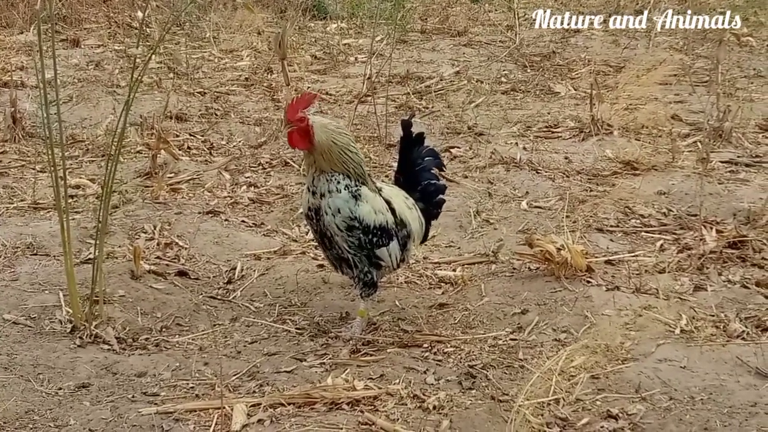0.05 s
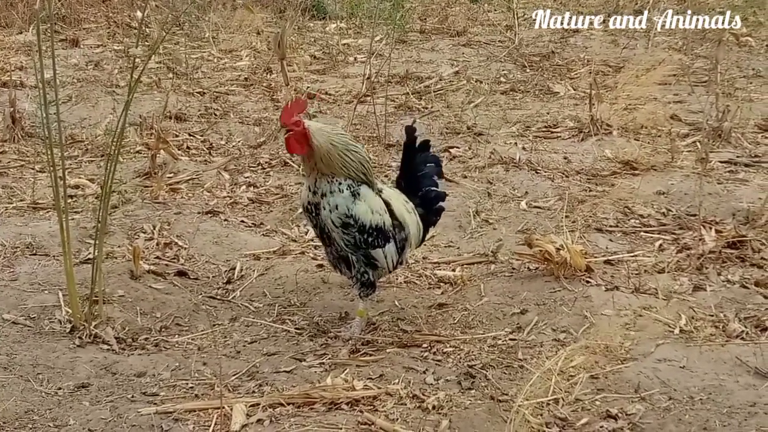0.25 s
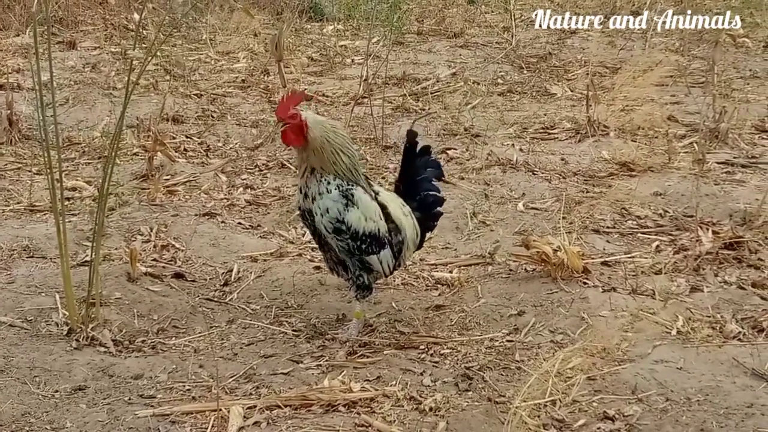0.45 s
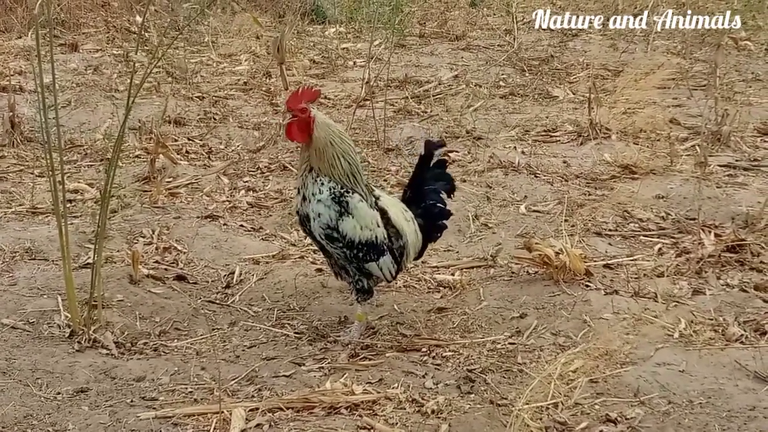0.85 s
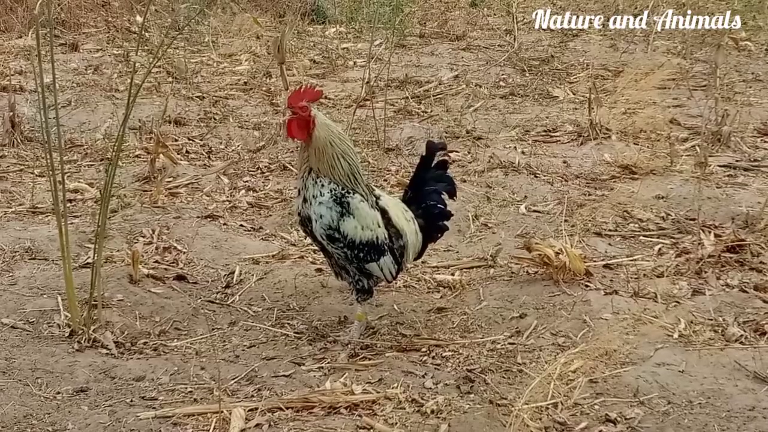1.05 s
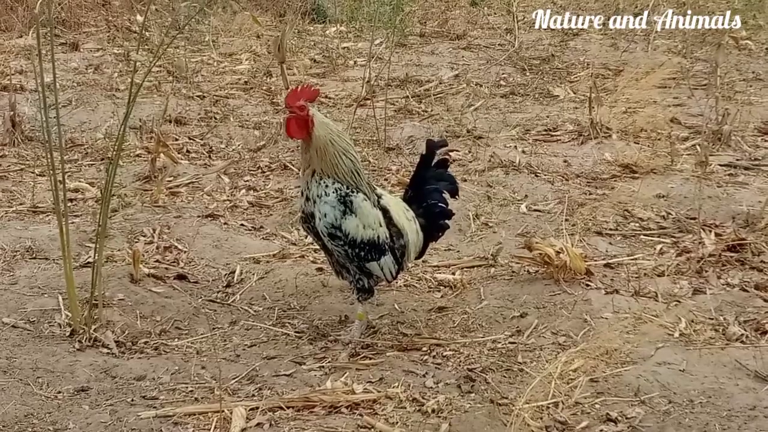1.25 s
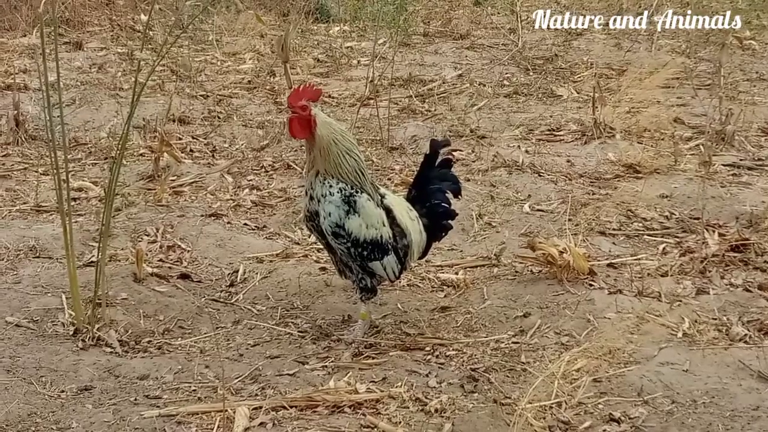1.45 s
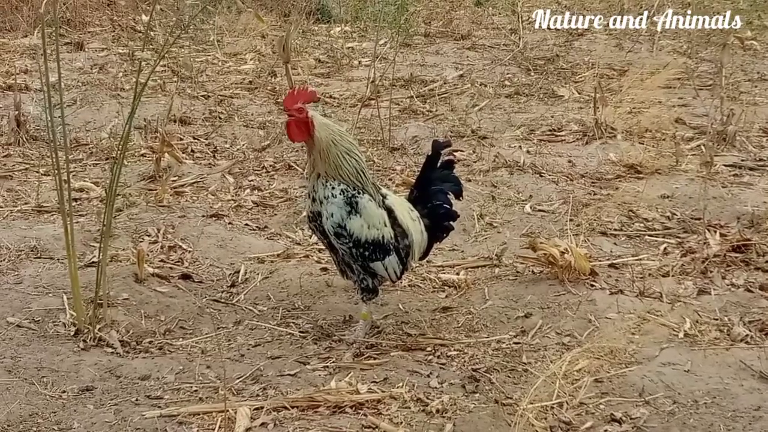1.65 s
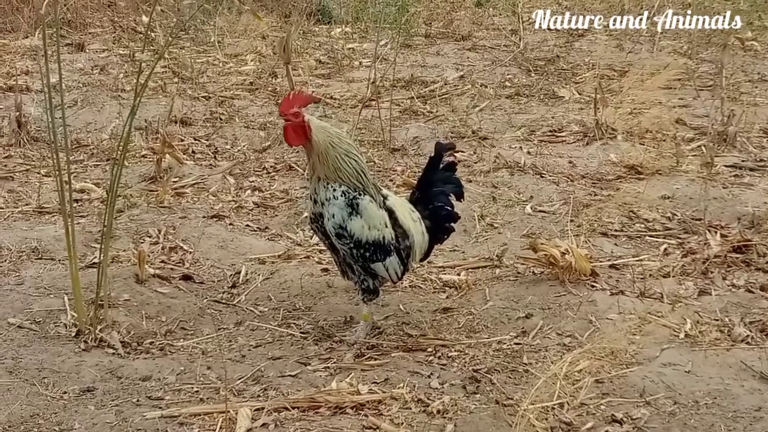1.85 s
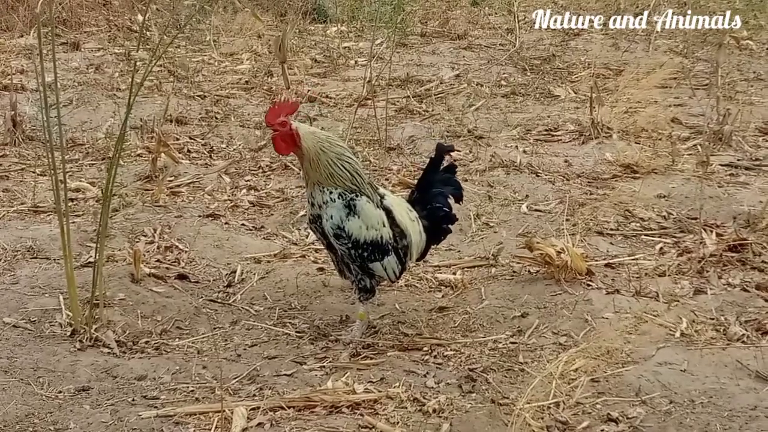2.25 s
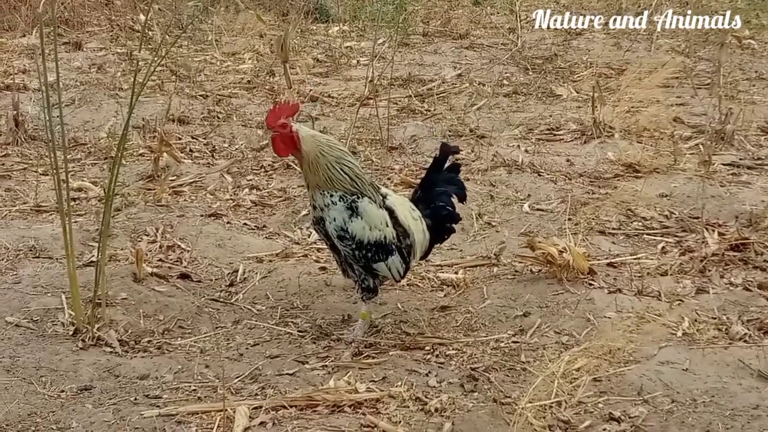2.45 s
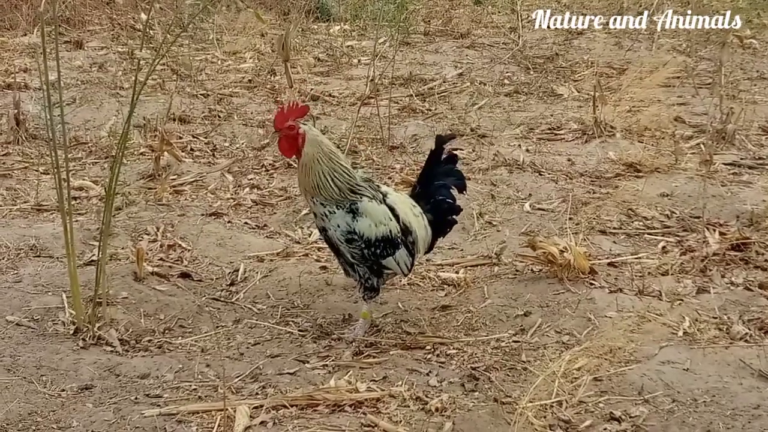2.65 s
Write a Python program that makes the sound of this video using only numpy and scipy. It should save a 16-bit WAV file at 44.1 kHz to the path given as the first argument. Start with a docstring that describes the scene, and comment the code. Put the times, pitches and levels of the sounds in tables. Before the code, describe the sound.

A rooster crows once, close by in an open field. A hoarse syllable starts at 0.2 seconds, a short high one follows near 0.5, and a long raspy note runs from 0.6 to 2.5, finishing cleaner and lower, then trailing into a soft groan by 2.7. A distant bird calls faintly in the first 0.6 seconds. Light wind bumps the microphone near 0.3 and 2.2, over a faint steady hush.

```python
"""A rooster crows once, close by, in an open field: a hoarse syllable, a short high one, a long one.
His syrinx has a high and a low register, each a harmonic series. Where they clash, the coupled
membranes beat chaotically and drive the throat resonances into a rasp. The crow ends on a clean low
note and a soft groan. Another bird calls far off, and light wind bumps the microphone."""
import sys
import numpy as np
from scipy import signal
from scipy.fft import rfft, irfft
from scipy.io import wavfile
from scipy.ndimage import uniform_filter1d

SR = 44100
rng = np.random.default_rng(int(sys.argv[2]) if len(sys.argv) > 2 else 0)


def persist_wave(psi):
    """Save psi, clipped to +-1, as 16-bit WAV."""
    counts = np.round(np.clip(psi, -1, 1) * 32767).astype(np.int16)
    wavfile.write(sys.argv[1], SR, np.atleast_2d(counts).T)


N = 119070

# Registers, one table a syllable: (time [s], pitch [Hz], nominal level [dB], roughness [1 = full])
HIGH_SYLLABLES = [
    [(.44, 641.4, -28, 0.33), (.458, 743, -25, 0.42), (.474, 795, -19, 0.3), (.49, 817, -21, 0.2),
     (.512, 783, -17, 0.2), (.54, 742, -17.5, 0.3), (.555, 661, -26.5, 0.2), (.585, 616, -36, 0.5)],
    [(.618, 621, -28.5, 0.77), (.645, 755, -19, 0.65), (.675, 782, -16, 0), (.73, 798.5, -17, 0),
     (.81, 789.4, -16.5, 0), (.85, 778, -17, 0.27), (.95, 752.2, -38, 0.92), (1.72, 742.3, -29, 0.65),
     (1.85, 735, -37.5, 0.94)],
]
LOW_SYLLABLES = [
    [(.2, 535.4, -44, 0.46), (.215, 558.6, -35, 0.63), (.3, 574.2, -30, 1.02), (.365, 575.5, -24, 0.13),
     (.39, 603, -51, 0.1)],
    [(.92, 540.7, -51.5, 0.64), (1.3, 593.8, -35.5, 0.77), (1.75, 588.1, -40, 0.8),
     (1.88, 600.6, -33.5, 0.29), (2.05, 591.5, -29.5, 0.48), (2.15, 580.2, -31.5, 1.2),
     (2.188, 605.7, -24.5, 0.05), (2.395, 581.2, -22.5, 0.17), (2.417, 569.3, -20, 0.37),
     (2.435, 511, -29.5, 0.87), (2.466, 473, -31.5, 1.08), (2.485, 315, -53.5, 1.1)],
]
# Spectral envelopes of the registers: (frequency [Hz], relative gain [dB])
HIGH_SPECTRUM = [(600, 7), (800, -10.5), (1600, 0.5), (2350, -7), (3150, 0), (3400, -22.5), (3800, -37),
                 (4800, -24.5), (5550, -20), (6350, -27.5), (7150, -28.5), (7700, -50.5), (8700, -39),
                 (9500, -56.5), (12000, -55.5)]
LOW_SPECTRUM = [(590, 7.5), (950, 3.5), (1190, 1), (1460, 15.5), (1780, -14.5), (2380, -1), (2950, 4.5),
                (3500, -31), (5400, -22.5), (6000, -32), (7500, -65.5), (10200, -35), (12000, -57)]
# Chaotic beating: (time [s], drive level [dB], beak opening [0-1])
RASP_DRIVE = [(.195, -53, 0.55), (.21, -19.5, 0.42), (.372, -22.5, 0), (.392, -35, 0.8), (.435, -57, 0.5),
              (.456, -12.5, 0.7), (.48, -42, 0.75), (.525, -41, 1), (.552, -26, 0.94), (.605, -37.5, 0.67),
              (.632, -20.5, 0.83), (.655, -24.5, 0.75), (.69, -51, 0.8), (.805, -47.5, 1), (.83, -23, 0.85),
              (.9, -18, 0.76), (1.15, -21, 0.78), (1.55, -18, 0.65), (1.9, -19.5, 0.42), (2.08, -23.5, 0.1),
              (2.165, -20, 0), (2.195, -43.5, 0.6), (2.41, -76, 0), (2.445, -23.5, 0.07),
              (2.468, -52.5, 0.2), (2.495, -88, 0.1)]
# The two clashing membranes: (time [s], low pitch [Hz], high pitch [Hz])
MEMBRANE_PITCHES = [(.35, 577.7, 790), (.95, 542, 775.7), (1.35, 588, 773.2), (1.7, 586, 749),
                    (1.95, 595, 776.7)]
# Throat and beak resonances:
# (centre [Hz], bandwidth [Hz], gain wide open [dB], gain nearly shut [dB], voiced share [0-1])
FORMANTS = [(580.6, 46, -33.5, -10.5, 0.31), (793, 340, -15, -34, 0.07), (1137, 240, -18, -11.5, 0.27),
            (1383, 123, -19, -4.5, 0.53), (1495, 240, -15, -16.5, 0.4), (1954, 140, -12.5, -16.5, 0.12),
            (2278, 210, -10, -14, 0.6), (2682, 360, -13.5, -6.5, 0.17), (2880, 180, -11, -14.5, 0.6),
            (3346, 320, -15.5, -22.5, 0.6), (4014, 120, -27.5, -35.5, 0.2), (4457, 400, -4, -75, 0.1),
            (5103, 223, -14.5, -29, 0.1), (5840, 330, -21, -59, 0.3), (6660, 210, -26.5, -60, 0.1),
            (7490, 220, -34.5, -72, 0.2)]
# Register overtones that stand out of the rasp: (time [s], frequency [Hz], nominal level [dB])
OVERTONE_TRACKS = [
    [(.91, 1095, -30), (1.18, 1119, -30), (1.36, 1200, -28.5)],
    [(.86, 1535, -35.5), (1.08, 1557, -22.5), (1.27, 1519, -39.5), (1.37, 1539, -32.5), (1.8, 1469, -30.5)],
    [(1.15, 2310, -34), (1.36, 2337, -27.5)],
    [(1.77, 2397, -31), (1.97, 2426, -28), (2.15, 2328, -34.5)],
    [(.88, 2600, -46.5), (1.06, 2731, -25), (1.24, 2767, -30), (1.39, 2895, -25), (1.72, 2901, -28.5),
     (1.85, 2870, -29), (2.16, 2853, -30.5)],
]
# Groans and the far bird, one table a call: (time [s], pitch [Hz], level [dB], roughness [1 = full])
GROAN_CALLS = [
    [(.11, 238.6, -72, .3), (.16, 263.2, -52, 0.1), (.205, 240, -59, 0.4)],
    [(2.49, 240.5, -58, 0.8), (2.54, 263.8, -44.5, 1), (2.7, 242, -49, 1.14)],
]
FAR_CALLS = [
    [(0, 794, -36.5, 1.23), (.06, 750, -45.5, 0.41), (.21, 762, -40, 1)],
    [(.37, 554, -37.5, 0), (.445, 514, -35.5, 0.4)],
    [(.555, 547, -32, 0), (.578, 526, -27.5, 0.4), (.603, 556, -41.5, 0.04), (.63, 510, -16, 0)],
]
# Wind on the microphone: (time [s], level [dB])
WIND_GUSTS = [(0, -60), (.2, -52), (.3, -33), (.345, -68.5), (1.93, -67.5), (1.99, -50.5), (2.22, -62),
              (2.25, -43), (2.4, -59)]
# Spectral envelopes of groans, far bird, wind and field: (frequency [Hz], relative gain [dB])
GROAN_SPECTRUM = [(260, 2), (530, 6), (790, -16), (1150, 7.5), (2400, -12.5), (3500, -51)]
FAR_SPECTRUM = [(530, -13), (770, -11), (1080, 10.5), (1520, 6.5), (1700, 1.5), (2250, -14), (4500, -18)]
WIND_SPECTRUM = [(25, -27), (50, -6.5), (150, -4.5), (320, -33.5), (2000, -77)]
FIELD_SPECTRUM = [(30, -22), (150, 0), (350, -12), (900, -9.5), (1400, 8.5), (4000, -2), (6000, -6),
                  (7500, -39), (16000, -36)]

WANDER_SHARE, JITTER_CYCLES, SHIMMER_DB, DULLING_DB = 0.01888, 0.013, 0.5, -9.5  # at full roughness
FLUTTER_SHARE, FLUTTER_DB, FLICKER_DB, STRAIN_CYCLES = .0035, 4, 1.5, .005  # at flutter = 1
FLUTTER_HZ, STRAIN_HZ = 39.65, 215


def rooster():
    """Superposition: the rasp, the two registers of the syrinx and their overtones form the crow."""
    high_lead, low_lead, chaos_lead = competition()
    power, chaos = effort()
    crow = rasp() * np.sqrt(chaos_lead) + overtones()
    # The registers come and go while the syrinx is chaotic.
    crow += voice(HIGH_SYLLABLES, HIGH_SPECTRUM, harmonics=19, flutter=0.73) * high_lead ** chaos
    crow += voice(LOW_SYLLABLES, LOW_SPECTRUM, harmonics=19) * low_lead ** chaos
    return saturate(crow, power, chaos)


def voice(syllables, spectrum, harmonics, flutter=0):
    """A nearly periodic vibration gives a harmonic series; roughness perturbs pitch, phase and level."""
    t = np.arange(N) / SR
    out = np.zeros(N)
    for rows in syllables:
        hz, db, rough = curves(rows)
        rough = np.clip(rough, .09, 1)
        tremble = flutter * np.sin(2 * np.pi * np.cumsum(FLUTTER_HZ * (1 + 0.15 * walk(23))) / SR)
        hz = hz * (1 + WANDER_SHARE * rough * walk(130) + FLUTTER_SHARE * tremble + 0.0012 * walk(200))
        cycles = np.cumsum(hz) / SR + JITTER_CYCLES * rough * walk(500)
        # The low membrane beats against the high note.
        cycles += flutter * STRAIN_CYCLES * np.sin(2 * np.pi * STRAIN_HZ * t + 2 * walk(260))
        gate = during(rows, edge_s=0.0063)
        on = gate > 0
        series, power = 0, 0
        for k in range(1, harmonics + 1):
            treble = np.interp(k * hz[on], [2950, 3100], [0, 1])
            gain = spectral_gain(spectrum, k * hz[on]) * undb(DULLING_DB * rough[on] * treble)
            power += gain ** 2 / 2
            sway_db = (SHIMMER_DB * rough[on] + flutter * FLICKER_DB * (k > 4)) * walk(110)[on]
            sway_db += FLUTTER_DB * tremble[on] * np.clip(k / 2 - 1, 0, 1)
            sway_db += 2.5 * (k > 5) * walk(15)[on]  # upper harmonics also sway slowly
            series += gain * undb(sway_db) * np.sin(2 * np.pi * k * cycles[on])
        out[on] += series / np.sqrt(power) * gate[on] * undb(db[on])
    return out


def rasp(median_closure_hz=646, scatter_db=2):
    """Source and filter: clashing tones and irregular closures ring the throat; a shut beak dulls it."""
    drive_db, opening = curves(RASP_DRIVE)
    timing, size = rng.standard_normal((N // 20, 2)).T
    closures = np.cumsum(np.exp(.3 * timing)) * SR / median_closure_hz
    inside = closures < N
    pulses = np.bincount(closures[inside].astype(int), undb(scatter_db * size[inside]), N)
    tones = clash()
    out = undb(-63.5) * resonance(pulses, hz=9750, width=1300)  # faint hiss
    for k, (hz, width, open_db, shut_db, voiced) in enumerate(FORMANTS):
        tonal = np.sqrt(voiced) * resonance(tones, hz, width)
        pulsed = np.sqrt(1 - voiced) * resonance(pulses, hz, width)
        out += (-1) ** k * (tonal + pulsed) * undb(shut_db + (open_db - shut_db) * opening)
    return out * undb(drive_db)


def clash(wander_share=0.01725):
    """Intermodulation: each membrane modulates the other, adding tones at sums of their harmonics."""
    pitches = [hz * (1 + wander_share * walk(98)) for hz in curves(MEMBRANE_PITCHES)]
    low, high = (np.exp(2j * np.pi * np.cumsum(hz) / SR) for hz in pitches)
    return np.real(np.polyval(np.ones(12), low) * np.polyval(np.ones(3), high))  # orders 0-11 by 0-2


def overtones(waver_hz=20, throb_db=3.5):
    """Register overtones stand out of the rasp as gliding tones, modulated in frequency and level."""
    out = 0
    for rows in OVERTONE_TRACKS:
        hz, db = curves(rows)
        cycles = np.cumsum(hz + waver_hz * walk(260)) / SR
        throb = undb(throb_db * walk(90))
        out += during(rows) * undb(db) * unit(throb * np.sin(2 * np.pi * cycles))
    return out


def competition():
    """Mode competition: high register, low register and chaos lead by turns, at constant total power."""
    leads = undb(7 * np.array([walk(90) for _ in range(3)]))
    return leads / np.sqrt(np.mean(leads ** 2, axis=0))


def effort():
    """Incoherent parts add in power: gives the crow's nominal power and its chaotic share."""
    overtone_power = sum((during(rows) * undb(curves(rows)[1])) ** 2 for rows in OVERTONE_TRACKS)
    chaotic_power = undb(curves(RASP_DRIVE)[0]) ** 2 + overtone_power
    power = chaotic_power + sum(undb(curves(rows)[1]) ** 2 for rows in HIGH_SYLLABLES + LOW_SYLLABLES)
    return power, chaotic_power / power


def saturate(x, power, chaos, strength=.65):
    """Saturation: the membranes swing only so far, so chaotic stretches stay near the nominal power."""
    running_power = np.abs(uniform_filter1d(x ** 2, int(.007 * SR))) + .05 * power
    return x * (power / running_power) ** (strength / 2 * chaos)


def groans():
    """Weak, low-pitched vibration gives a soft harmonic groan before and after the crow."""
    return voice(GROAN_CALLS, GROAN_SPECTRUM, harmonics=12)


def echo(x, t60_s=0.93, cutoff_hz=3520):
    """Scattering from the ground and stalks leaves a faint, dull tail that decays exponentially."""
    t = np.arange(N // 4) / SR
    tail = rng.standard_normal(len(t)) * np.exp(-np.log(1000) * t / t60_s)
    lowpass = signal.butter(2, cutoff_hz, fs=SR, output="sos")
    tail = signal.sosfilt(lowpass, tail / np.linalg.norm(tail))
    return undb(-25) * signal.fftconvolve(x, tail)[:N]


def far_bird():
    """A distant bird calls three notes, each a short harmonic series."""
    return voice(FAR_CALLS, FAR_SPECTRUM, harmonics=6)


def wind():
    """Pressure fluctuations of light wind bump the microphone with low-frequency noise."""
    return noise(WIND_SPECTRUM) * undb(curves(WIND_GUSTS)[0])


def field_hush(level_db=-50.5):
    """Stationary broadband noise forms the hush of the field."""
    return undb(level_db) * noise(FIELD_SPECTRUM)


def undb(db):
    """Amplitude grows tenfold every 20 dB."""
    return 10 ** (np.asarray(db) / 20)


def unit(x):
    """Normalisation to rms 1."""
    return x / np.sqrt(np.mean(x ** 2))


def curves(rows):
    """Linear interpolation turns each column into a curve over time."""
    times, *columns = np.array(rows, float).T
    return [np.interp(np.arange(N) / SR, times, column) for column in columns]


def during(rows, edge_s=0.059):
    """A trapezoidal window spans the times of a table."""
    t = np.arange(N) / SR
    return np.clip(np.minimum(t - rows[0][0], rows[-1][0] - t) / edge_s, 0, 1)


def spectral_gain(spectrum, hz):
    """Gain of a spectral envelope, interpolated in decibels over log frequency."""
    knots_hz, knots_db = np.array(spectrum, float).T
    return undb(np.interp(np.log(hz + 1e-9), np.log(knots_hz), knots_db))


def noise(spectrum):
    """Spectral weighting colours white noise; rms 1."""
    gain = spectral_gain(spectrum, np.fft.rfftfreq(N, 1 / SR))
    return unit(irfft(rfft(rng.standard_normal(N)) * gain, N))


def walk(rate_hz):
    """Random modulation of rms 1, gliding to a new value rate_hz times a second."""
    return unit(np.interp(np.arange(N) / SR * rate_hz, np.arange(N // 10), rng.standard_normal(N // 10)))


def resonance(x, hz, width):
    """A resonance passes a band around its centre, with steep skirts; rms 1."""
    edges = [hz - width / 2, hz + width / 2]
    return unit(signal.sosfilt(signal.butter(2, edges, "band", fs=SR, output="sos"), x))


def scene():
    """Sound pressures add: the rooster, his echo and the background, in one channel."""
    crow = rooster()
    sources = crow + groans() + far_bird() + wind()
    return (sources + echo(crow) + field_hush())[None]


def record(dry, cutoff_hz=15600):
    """A steep elliptic low-pass filter removes the highest treble."""
    return signal.sosfilt(signal.ellip(8, .2, 70, cutoff_hz, fs=SR, output="sos"), dry)


dry = scene()
out = record(dry)
persist_wave(out)
```